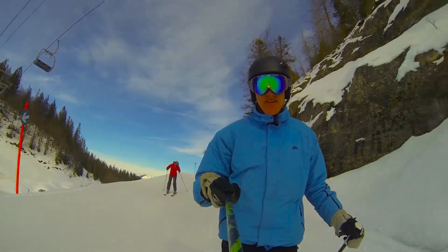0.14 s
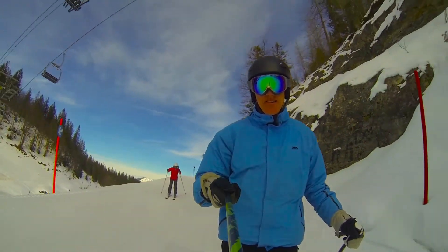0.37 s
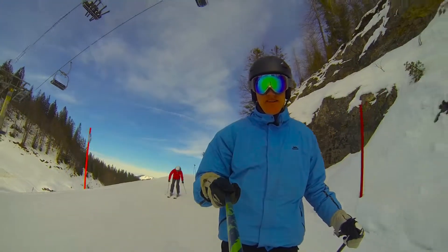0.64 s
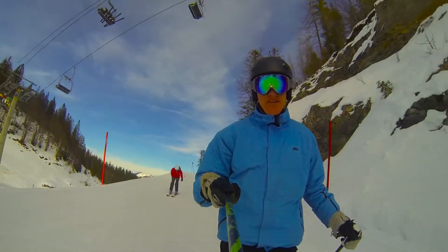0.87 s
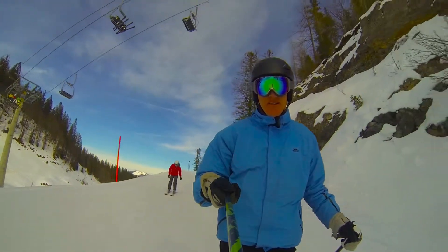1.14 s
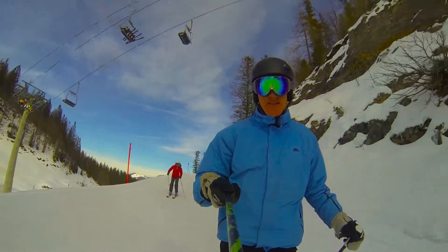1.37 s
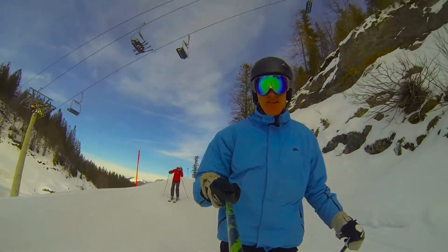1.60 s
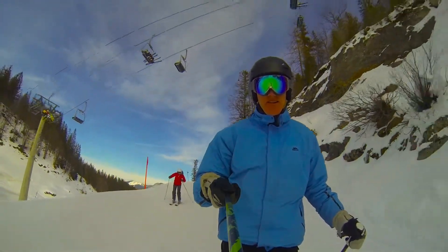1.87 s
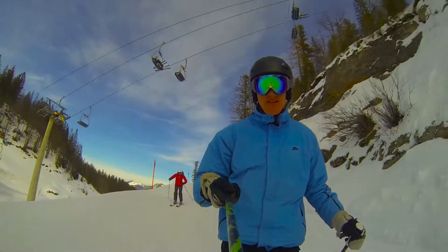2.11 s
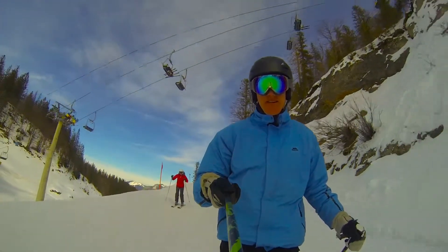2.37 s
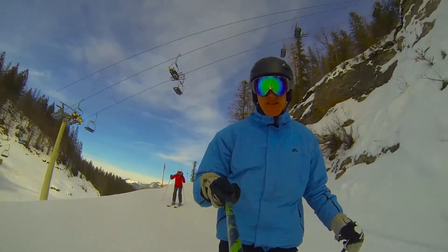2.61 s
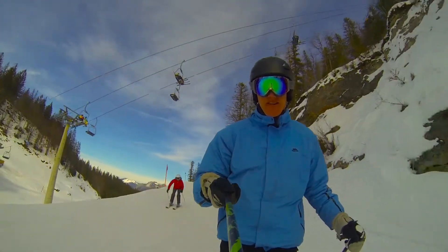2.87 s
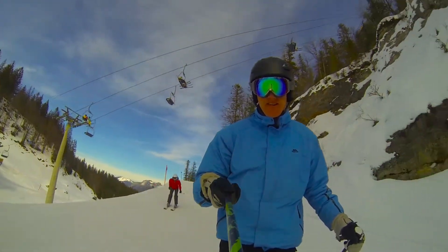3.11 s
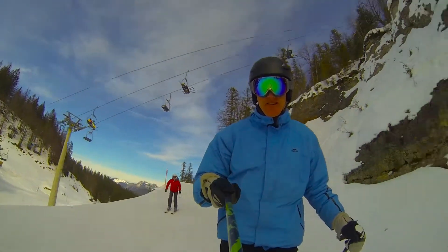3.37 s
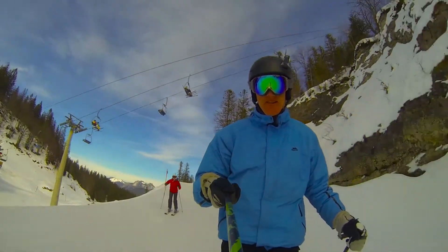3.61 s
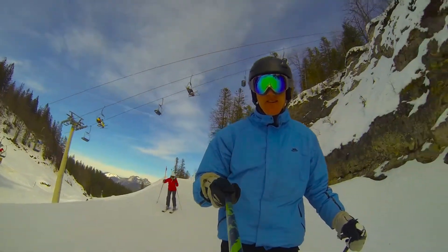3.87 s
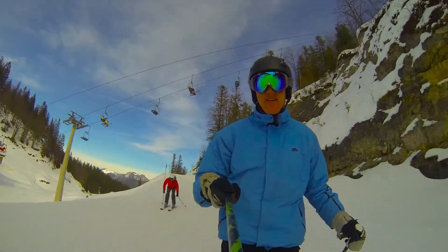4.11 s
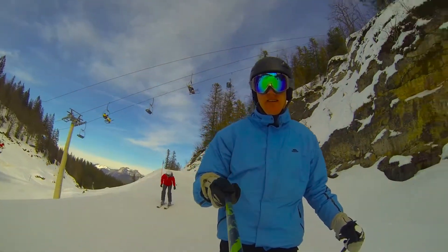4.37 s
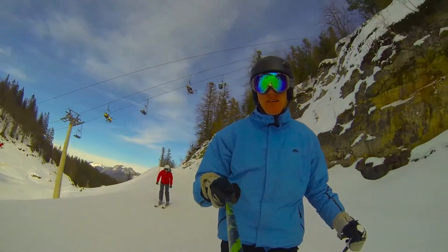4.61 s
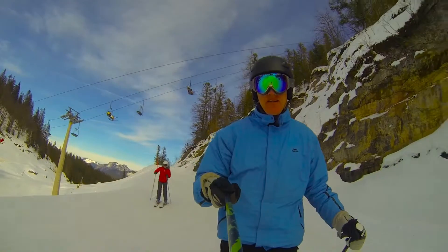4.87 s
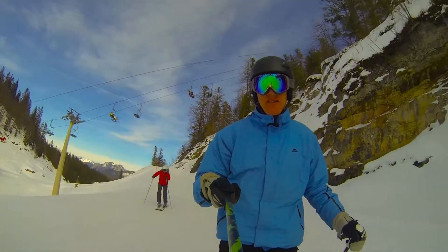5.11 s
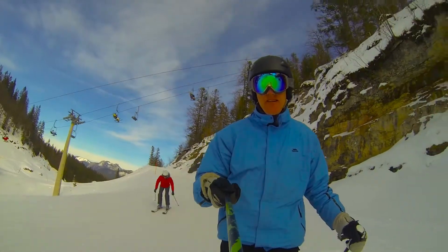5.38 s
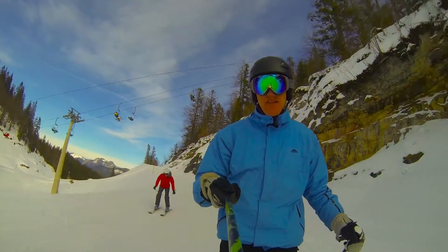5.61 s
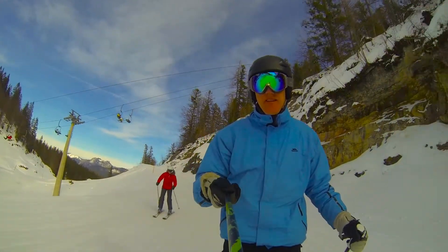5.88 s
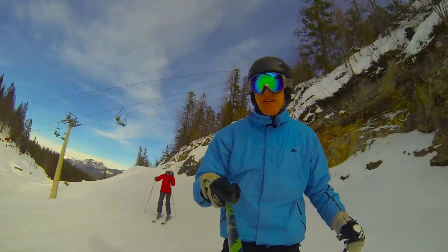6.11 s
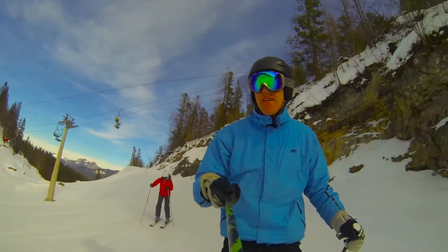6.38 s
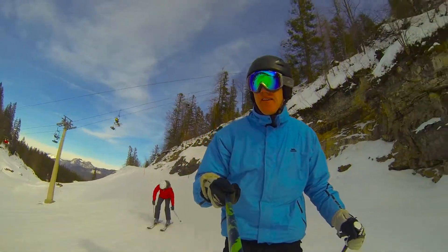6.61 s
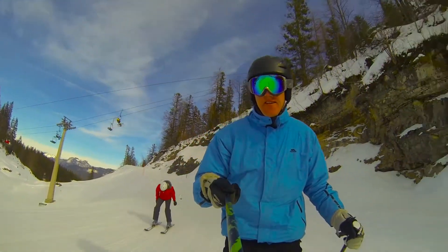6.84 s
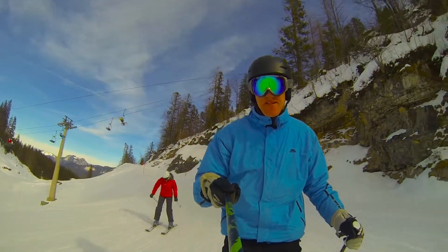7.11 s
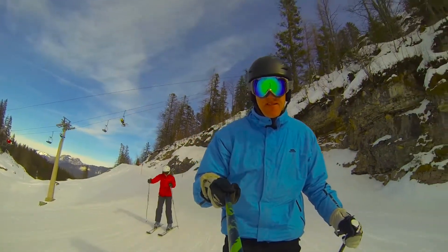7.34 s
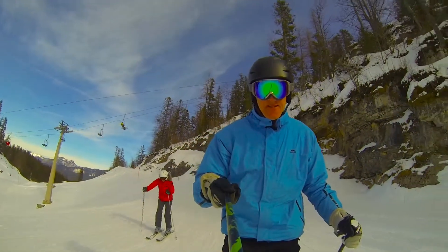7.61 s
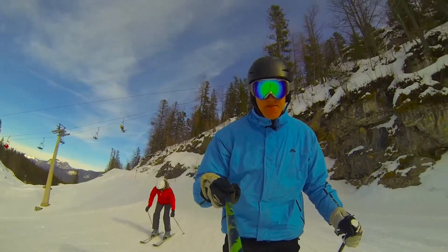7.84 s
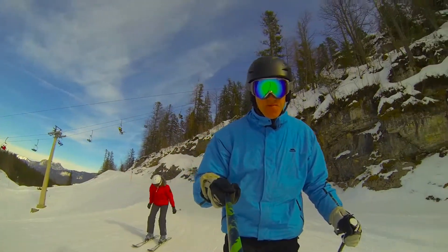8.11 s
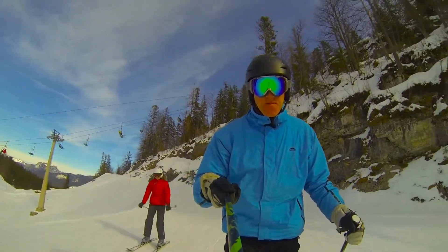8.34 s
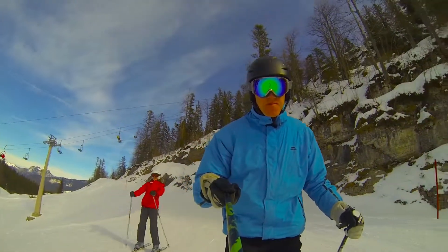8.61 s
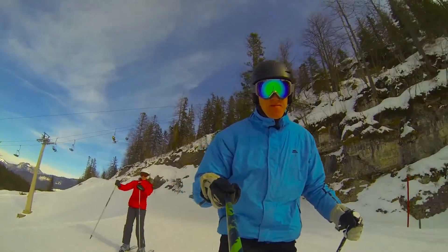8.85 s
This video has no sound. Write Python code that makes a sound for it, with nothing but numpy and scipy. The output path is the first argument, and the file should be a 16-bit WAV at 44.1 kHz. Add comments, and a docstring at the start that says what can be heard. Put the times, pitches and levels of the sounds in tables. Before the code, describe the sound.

Close, muffled, bass-heavy sound from a microphone inside a case: wind rumbles steadily while the pole shudders and hums in irregular swells, busiest from about one to six seconds. Soft ski glide over packed snow stays behind it. Breathy hollow puffs and tiny dull or bright knocks interrupt, the puffs clustering after six seconds. Low sounds dip briefly at times; faint amplifier hiss never stops.

```python
"""A skier glides down packed snow, holding a small sealed camera on a pole.
From the start: wind rumble and ski hiss (shaped noise), light air in the case's hollow (resonated
noise), the pole's low throb and 150 Hz hum (wavering sines), amplifier hiss, and readout interference
gated each frame. From 0.04 s hum and throb swell at irregular moments; from 0.09 s air puffs ring the
hollow and thump the walls, and clamp knocks ring both (impulses). From 0.78 s rumble, throb and hum dip at times."""
import sys
import numpy as np
from scipy import signal
from scipy.fft import rfft, irfft
from scipy.io import wavfile
from scipy.ndimage import uniform_filter1d

SR = 44100
rng = np.random.default_rng(int(sys.argv[2]) if len(sys.argv) > 2 else 0)


def invert_db(level):
    """Linear amplitude ratio for a level in decibels (20 dB per decade), elementwise."""
    return 10 ** (np.asarray(level, dtype=float) / 20)


def transcribe(u):
    """Save the signal u as a 16-bit wav file named by the first command-line argument.

    u: samples, shape (n,) or (channels, n), limited to [-1, 1]; the rate is SR.
    q: integer samples, one column per channel.
    """
    v = np.clip(np.atleast_2d(u).T, -1, 1)
    q = np.round(v * 32767).astype(np.int16)
    wavfile.write(sys.argv[1], SR, q)


N = 396018
T = np.arange(N) / SR

# Slow speed changes: t/s, wind rumble level/dB, ski hiss level/dB, light air in the hollow level/dB
GLIDE = [(0.0, -36, -54.5, -51), (0.12, -37.5, -58, -50), (0.7, -36.5, -58, -53), (1.3, -34.5, -56, -48.5),
         (2.5, -33, -55.5, -49.5), (2.75, -36.5, -56.5, -50.5), (3.2, -34, -55, -51),
         (4.1, -35, -58, -49.5), (4.5, -35, -56, -50), (5.2, -34.5, -56.5, -50), (5.9, -36, -58, -53),
         (6.65, -37, -57.5, -52), (7.1, -37, -57.5, -55.5), (7.75, -37, -56.5, -53),
         (8.1, -36.5, -58.5, -53.5), (8.6, -36.5, -54, -58), (8.85, -36, -56.5, -50.5),
         (8.98, -34, -53, -49.5)]
# Wind rumble spectrum on the case: f/Hz, relative density level/dB per Hz
RUMBLE_SPECTRUM = [(3, -17), (8, 2.5), (18, 2.5), (36, -0.5), (44, -3.5), (55, -2), (74, -2.5), (84, -9),
                   (97, -2), (112, -9), (135, -3.5), (175, -8), (215, -20), (300, -33), (500, -65.5)]
# Ski hiss spectrum through the case: f/Hz, relative density level/dB per Hz
SLIDE_SPECTRUM = [(500, -17.5), (1000, -4), (1700, -3.5), (2000, 3), (2300, -3.5), (2600, -3), (3000, -7.5),
                  (3500, -10), (4200, -18.5), (5000, -18.5), (6000, -29.5), (9000, -36)]
# Microphone amplifier hiss spectrum: f/Hz, relative density level/dB per Hz
HISS_SPECTRUM = [(2000, 2), (4500, -0.5), (5900, 1.5), (7200, 0), (8600, 1), (9500, -2.5), (11000, -2),
                 (12300, -2.5), (14200, -7), (14700, -4), (16000, -13)]
HISS_DB = -70
# Interference bands during frame readout: f/Hz, width per resonator pass/Hz, level while on/dB
READOUT_BANDS = [(5170, 330, -79.5), (6400, 360, -81.5), (10150, 380, -79.5), (13100, 300, -91),
                 (13700, 500, -79.5), (15300, 300, -81)]
FRAMES_PER_S, READ_FROM_FRAME, READ_SHARE_FRAME = 29.97, 0.71, 0.43

# Louder moments of the pole's 150 Hz hum: t/s, length/s, nominal level/dB (short ones peak lower)
HUM_SWELLS = [(0.04, 0.044, -37), (0.648, 0.034, -36), (1.133, 0.17, -34.5), (1.554, 0.12, -32),
              (1.832, 0.066, -34), (1.914, 0.11, -33.5), (2.06, 0.033, -37.5), (2.155, 0.042, -33),
              (2.277, 0.035, -34.5), (2.43, 0.066, -37), (2.55, 0.046, -33.5), (2.622, 0.052, -33),
              (2.738, 0.091, -32), (2.933, 0.04, -35.5), (3.038, 0.042, -34), (3.134, 0.21, -33.5),
              (3.37, 0.11, -32), (3.744, 0.069, -32), (3.875, 0.076, -28.5), (3.985, 0.11, -34.5),
              (4.306, 0.05, -34.5), (4.364, 0.057, -34.5), (4.587, 0.13, -33.5), (4.907, 0.038, -36.5),
              (5.072, 0.033, -35.5), (5.12, 0.036, -34.5), (5.23, 0.027, -38), (5.29, 0.051, -33.5),
              (5.424, 0.048, -32), (5.507, 0.068, -38), (5.705, 0.082, -38), (5.925, 0.096, -35.5),
              (6.305, 0.046, -36), (6.49, 0.042, -32.5), (8.587, 0.03, -35), (8.855, 0.032, -34)]
# Louder moments of the pole's low throb: t/s, length/s, nominal level/dB (short ones peak lower)
THROB_SWELLS = [(0.059, 0.68, -29), (0.774, 0.09, -28.5), (0.947, 0.059, -27), (1.044, 0.059, -27.5),
                (1.306, 0.48, -28.5), (1.883, 0.08, -30), (2.021, 0.096, -29.5), (2.201, 0.33, -31.5),
                (2.862, 0.24, -32.5), (3.297, 0.042, -29), (3.38, 0.14, -34), (3.62, 0.32, -30.5),
                (3.986, 0.38, -31), (4.744, 0.086, -31.5), (4.919, 0.31, -27), (5.28, 0.074, -27.5),
                (5.88, 0.21, -32), (6.18, 0.12, -32), (6.43, 0.086, -31), (6.674, 0.087, -28.5),
                (6.984, 0.08, -32.5), (7.238, 0.072, -28), (7.467, 0.11, -32), (7.645, 0.066, -30),
                (7.854, 0.22, -31.5), (8.32, 0.071, -26.5), (8.55, 0.4, -28)]
THROB_HZ, HUM_HZ = 25.47, 149.9  # first and second bending modes
THROB_RISE_S, THROB_FALL_S, HUM_RISE_S, HUM_FALL_S = 0.046, 0.036, 0.027, 0.017
REST_THROB_DB = -41.5  # low throb between louder moments
REST_HUM_RE_RUMBLE_DB = -5.5  # 150 Hz hum between louder moments

# Air puffs into the hollow: t/s, length/s, nominal level/dB, wall thump level re puff/dB
PUFFS = [(0.088, 0.06, -43, -6.5), (0.154, 0.022, -47, -5), (0.287, 0.029, -43.5, -4.5),
         (1.36, 0.029, -47, -9), (1.692, 0.073, -48, -7), (2.017, 0.036, -46, -16),
         (2.273, 0.026, -42.5, -14), (2.497, 0.073, -44.5, -8), (2.933, 0.041, -39.5, -10),
         (3.128, 0.047, -44.5, -8), (3.247, 0.088, -36, -16), (3.393, 0.053, -30, -13),
         (3.694, 0.079, -42, -11), (4.212, 0.07, -37, -12.5), (4.356, 0.071, -41.5, -11),
         (4.947, 0.028, -47, -15), (5.418, 0.15, -37.5, -15), (5.881, 0.089, -44, -13),
         (5.941, 0.12, -40, -13), (6.129, 0.041, -40, -11), (6.276, 0.075, -39, -13.5),
         (6.738, 0.044, -45.5, -14), (6.797, 0.056, -40.5, -16), (6.852, 0.09, -37, -17),
         (7.008, 0.047, -44.5, -22), (7.167, 0.089, -41.5, -16), (7.365, 0.033, -43, -13),
         (7.452, 0.043, -43, -13), (7.556, 0.09, -39, -15.5), (7.792, 0.075, -37, -14),
         (7.926, 0.061, -47, -15), (8.157, .05, -49.5, -21), (8.262, 0.069, -49.5, -15),
         (8.779, 0.05, -43.5, -11.5)]
# Hollow resonances: f/Hz, width per pass/Hz, relative level in light air/dB, in a strong puff/dB
HOLLOW_MODES = [(1256, 256, 2, 0), (1433, 168, 1, 4), (1520, 220, -0.5, -3), (1907, 200, -17, -18)]
# Wall thump spectrum of a puff: f/Hz, relative density level/dB per Hz
THUMP_SPECTRUM = [(120, -37), (240, 10.5), (310, 2.5), (520, 7), (650, 4.5), (750, 2), (900, 6.5),
                  (1050, 3.5), (1300, -28), (2500, -67)]
PUFF_RISE_S, PUFF_FALL_S = 0.018, 0.018
REST_THUMP_RE_RUMBLE_DB = -21  # walls between puffs

# Clamp knocks: t/s, first-contact wall peak level/dB, hollow level re walls (brightness)/dB
KNOCKS = [(0.095, -44, 8), (0.119, -37, 12.5), (0.172, -40.5, 6.5), (0.309, -44.5, 16), (1.361, -46, 12.5),
          (1.82, -38, -9), (1.83, -33, -8), (2.03, -47, 13), (2.279, -40, 0), (2.503, -45, 8),
          (2.535, -37.5, 8.5), (2.954, -39, 10), (3.247, -42.5, 0), (3.289, -47, 20), (3.888, -35.5, -4),
          (4.224, -44, 12), (4.364, -40, 7), (4.97, -50, 18.5), (5.431, -45, 15), (5.566, -42, 9),
          (6.083, -34, -15), (6.093, -38, -6), (6.813, -57, 10), (6.852, -55, 9), (7.001, -50, 12),
          (7.179, -47, 17.5), (7.55, -50, 18.5), (7.584, -49.5, 20), (8.265, -50, 16.5), (8.723, -44, 1)]
# Clamp and case wall resonances: f/Hz, width per pass/Hz, relative level/dB
WALL_MODES = [(273, 87, -1.5), (430, 150, -4), (558, 62, 3), (658, 91, -2.5), (845, 86, 1)]

# Brief dips of rumble, throb and hum: t/s, gain at the centre level/dB
LULLS = [(.775, -9), (2.61, -5), (4.47, -5), (5.39, -6), (5.68, -7), (6.42, -7), (7.135, -9), (7.74, -1),
         (8.15, -12), (8.42, -6.5), (8.72, -8)]
LULL_HALF_WIDTH_S = 0.018  # to 1/e of the dB depth

EDGE_HZ = 15330


def evened(x):
    """Scales to rms 1."""
    return x / np.sqrt(np.mean(x ** 2) + 1e-20)


def follow(rows):
    """Interpolates each table column over all samples."""
    time_s, *columns = np.transpose(rows)
    return [np.interp(T, time_s, column) for column in columns]


def coloured(spectrum):
    """Gaussian noise of rms 1 with a given spectrum, interpolated over log frequency."""
    f_hz, level_db = np.transpose(spectrum)
    hz = np.fft.rfftfreq(N, 1 / SR)
    gain = invert_db(np.interp(np.log(hz + 1), np.log(f_hz + 1), level_db))
    return evened(irfft(rfft(rng.standard_normal(N)) * gain, N))


def wander(rate_hz):
    """Smooth random curve of rms 1; gaussian roll-off at rate_hz, slowest drift reduced."""
    hz = np.fft.rfftfreq(N, 1 / SR)
    gain = hz / (hz + 2) * np.exp(-(hz / rate_hz) ** 2)
    return evened(irfft(rfft(rng.standard_normal(N)) * gain, N))


def swells(rows, rise_s, fall_s, rest_db):
    """Level/dB of smooth rise-hold-fall moments, added in power to a resting level."""
    power = invert_db(rest_db) ** 2 * np.ones(N)
    for start_s, length_s, level_db in rows:
        before_hold = (start_s + rise_s - T) / rise_s
        after_hold = (T - start_s - length_s + fall_s) / fall_s
        outside = np.maximum(before_hold, after_hold)
        power += invert_db(level_db) ** 2 * np.exp(-np.maximum(outside, 0) ** 2)
    return 10 * np.log10(power)


def resonate_twice(x, f_hz, width_hz):
    """Two equal one-pole resonators in series: steep skirts, peak gain about 1."""
    radius = np.exp(-np.pi * width_hz / SR)
    turn = np.exp(2j * np.pi * f_hz / SR)
    for _ in range(2):
        x = 2 * signal.lfilter([1 - radius], [1, -radius * turn], x).real
    return x


def wind(rumble_db):
    """Wind on the case: low noise, lumpy in level."""
    return invert_db(rumble_db + 0.85 * wander(15.0)) * coloured(RUMBLE_SPECTRUM)


def skis(slide_db):
    """Skis sliding on snow: smooth hiss with a slight level waver."""
    return invert_db(slide_db + 1.21 * wander(33.0)) * coloured(SLIDE_SPECTRUM)


def electronics():
    """Steady amplifier hiss plus narrow interference bands gated once a frame."""
    frame_phase = (T * FRAMES_PER_S - READ_FROM_FRAME) % 1
    reading = uniform_filter1d((frame_phase < READ_SHARE_FRAME) * 1., size=40)
    white = rng.standard_normal(N)
    bands = sum(invert_db(level_db) * evened(resonate_twice(white, f_hz, width_hz))
                for f_hz, width_hz, level_db in READOUT_BANDS)
    return invert_db(HISS_DB) * coloured(HISS_SPECTRUM) + reading * bands


def bending_mode(f_hz, level_db, waver_hz, waver_db, rate_hz):
    """A bending mode: nearly a sine, pitch and strength wavering at random."""
    turns = np.cumsum(f_hz + waver_hz * wander(rate_hz)) / SR
    level = invert_db(level_db + waver_db * wander(rate_hz))
    return np.sqrt(2) * level * np.sin(2 * np.pi * (turns + rng.random()))


def pole(rumble_db):
    """Pole held at one end: first bending mode as a low throb, second as a hum."""
    rest_throb_db = REST_THROB_DB + 3.9 * wander(8.5)
    rest_hum_db = rumble_db + REST_HUM_RE_RUMBLE_DB + 3.08 * wander(10.8)
    throb_db = swells(THROB_SWELLS, THROB_RISE_S, THROB_FALL_S, rest_throb_db)
    hum_db = swells(HUM_SWELLS, HUM_RISE_S, HUM_FALL_S, rest_hum_db)
    throb = bending_mode(THROB_HZ, throb_db, waver_hz=3.02, waver_db=2.26, rate_hz=11.7)
    hum = bending_mode(HUM_HZ, hum_db, waver_hz=7.16, waver_db=1.92, rate_hz=28.0)
    return throb + hum


def hollow(x, strength):
    """Air space in the case: resonances of alternating sign; strength 0..1 shifts their balance."""
    rings = 0
    for k, (f_hz, width_hz, light_db, strong_db) in enumerate(HOLLOW_MODES):
        level_db = light_db + strength * (strong_db - light_db)
        rings = rings + (-1) ** k * invert_db(level_db) * resonate_twice(x, f_hz, width_hz)
    return signal.sosfilt(signal.butter(4, 2600, fs=SR, output="sos"), rings)


def puffs(light_db, rumble_db):
    """Turbulent air flutters fast and rings the hollow; the case walls thump along."""
    start_s, length_s, level_db, walls_db = np.transpose(PUFFS)
    rest_puff_db = light_db + 1.27 * wander(13.0)
    rest_thump_db = rumble_db + REST_THUMP_RE_RUMBLE_DB
    puff_db = swells(zip(start_s, length_s, level_db), PUFF_RISE_S, PUFF_FALL_S, rest_puff_db)
    thump_db = swells(zip(start_s, length_s, level_db + walls_db), PUFF_RISE_S, PUFF_FALL_S, rest_thump_db)
    strength = np.clip((puff_db + 48.5) / 16, 0, 1)
    flutter = invert_db((2.0 - 0.65 * strength) * wander(100.0))
    ring = hollow(flutter * rng.standard_normal(N), strength)
    ring /= np.sqrt(uniform_filter1d(ring ** 2, size=1800) + 1e-20)  # puff_db alone sets the slow level
    thump = np.sqrt(flutter) * coloured(THUMP_SPECTRUM)
    return invert_db(puff_db) * ring + invert_db(thump_db) * thump


def walls(x):
    """Clamp and case walls: resonances of alternating sign."""
    return sum((-1) ** k * invert_db(level_db) * resonate_twice(x, f_hz, width_hz)
               for k, (f_hz, width_hz, level_db) in enumerate(WALL_MODES))


def knocks():
    """Clamp knocks: two-contact blows ring the walls and, by brightness, the hollow."""
    dull, bright = np.zeros(N), np.zeros(N)
    second_contact = rng.uniform(-1.0, 1, (len(KNOCKS), 2))
    for (start_s, level_db, bright_db), (late, size) in zip(KNOCKS, second_contact):
        delay_s = 0.001976 + 0.00095 * late
        at = [round(start_s * SR), round((start_s + delay_s) * SR)]
        dull[at] = invert_db(level_db) * np.array([1, 0.87 * size])
        bright[at] = invert_db(bright_db) * dull[at]
    one = signal.unit_impulse(4000)
    wall_ring = walls(dull) / abs(walls(one)).max()
    hollow_ring = hollow(bright, 0.88) / abs(hollow(one, 0.87)).max()
    return wall_ring + hollow_ring


def lulls():
    """Gain that dips briefly, gaussian in dB."""
    return invert_db(sum(depth_db * np.exp(-((T - centre_s) / LULL_HALF_WIDTH_S) ** 2)
                   for centre_s, depth_db in LULLS))


def scene():
    """Sums all sources at the single microphone; lulls act on pole and wind only."""
    rumble_db, slide_db, light_db = follow(GLIDE)
    shaking = lulls() * (wind(rumble_db) + pole(rumble_db))
    mix = shaking + skis(slide_db) + electronics() + puffs(light_db, rumble_db) + knocks()
    return mix[None]


def roll_off(x):
    """The treble ends steeply here."""
    return signal.sosfilt(signal.butter(12, 15490, fs=SR, output="sos"), x)


def record(dry):
    """Band-limits the mix with a steep linear-phase low-pass."""
    low_pass = signal.firwin(511, EDGE_HZ, window=("kaiser", 9), fs=SR)
    limited = signal.oaconvolve(dry, low_pass[None], "same")
    return roll_off(limited)


dry = scene()
out = record(dry)
transcribe(out)
```